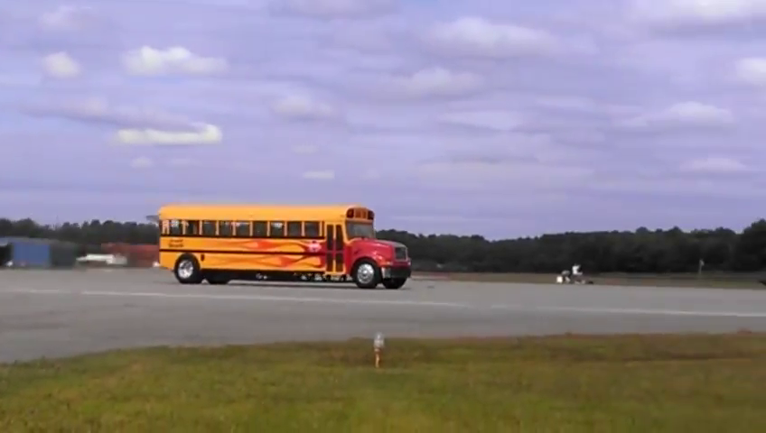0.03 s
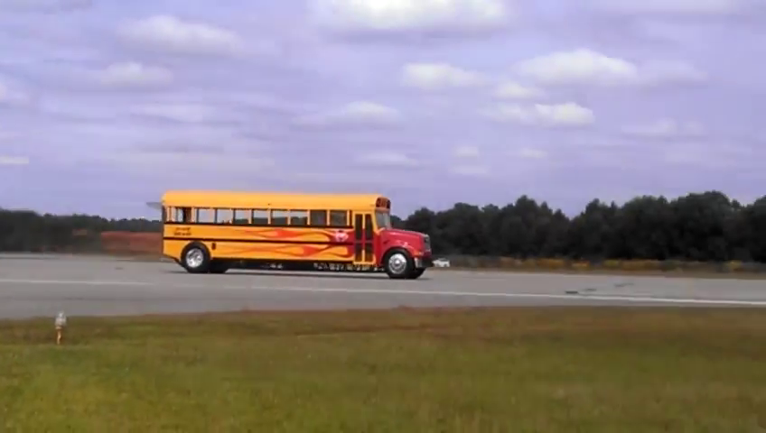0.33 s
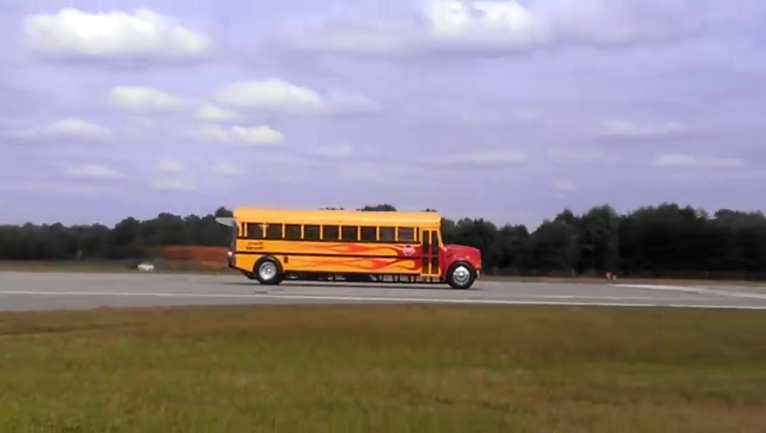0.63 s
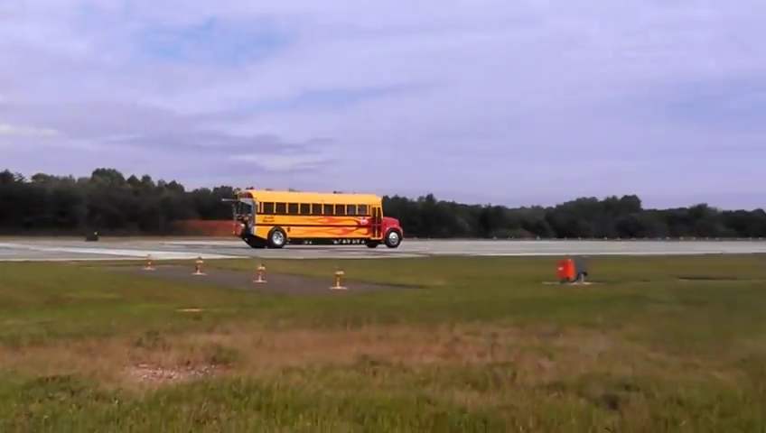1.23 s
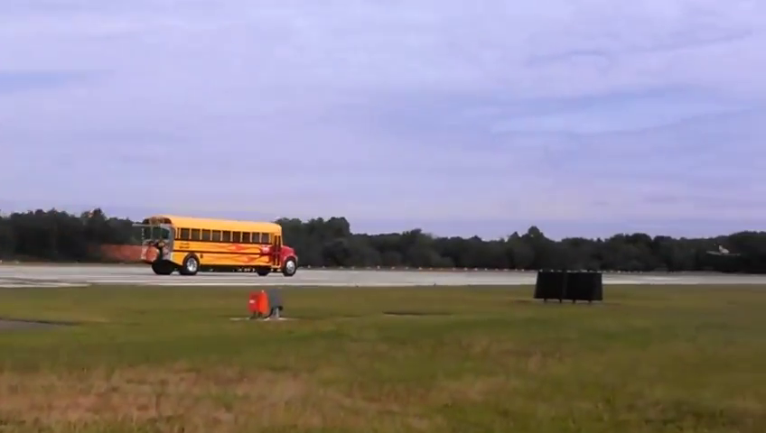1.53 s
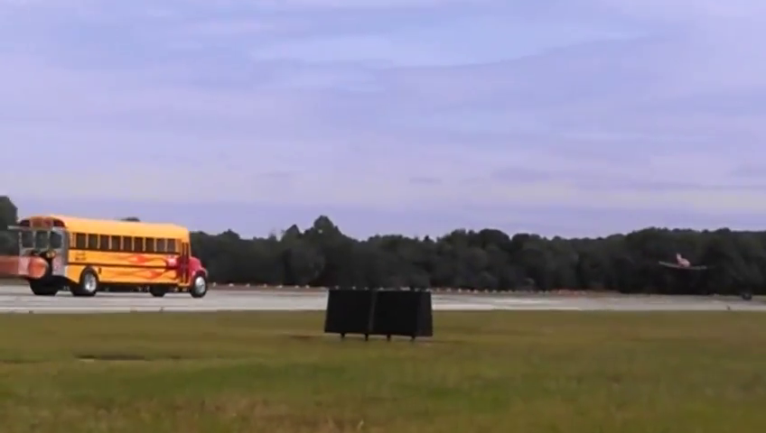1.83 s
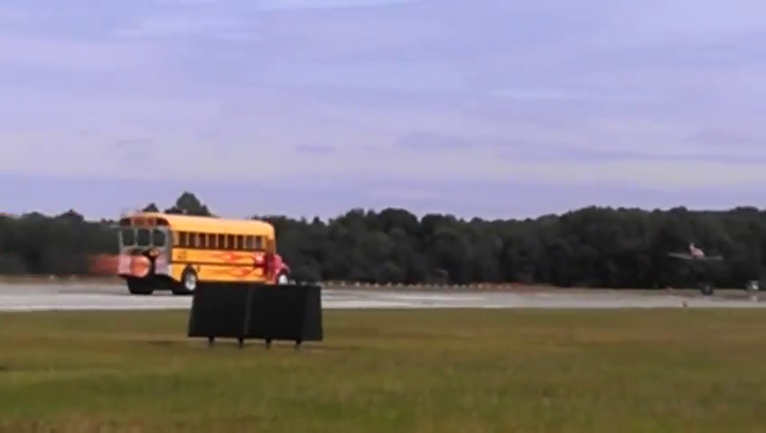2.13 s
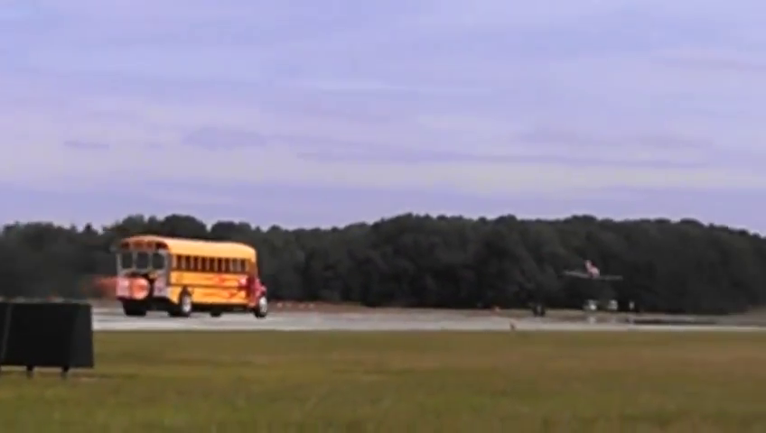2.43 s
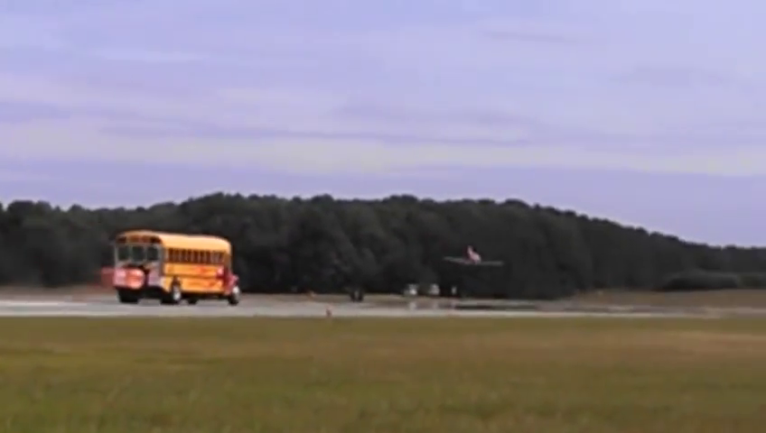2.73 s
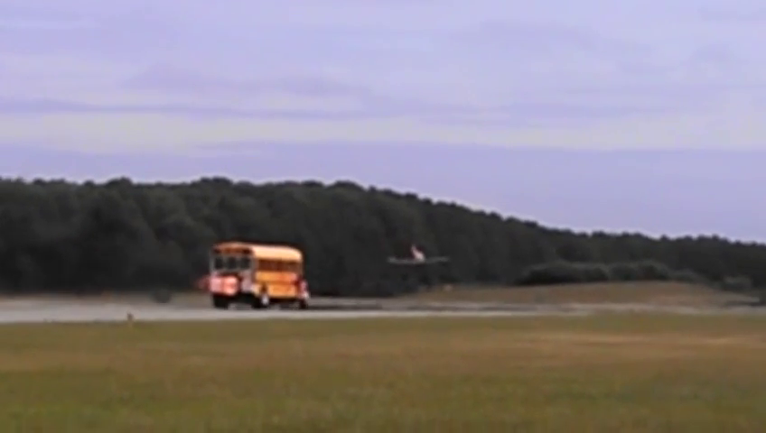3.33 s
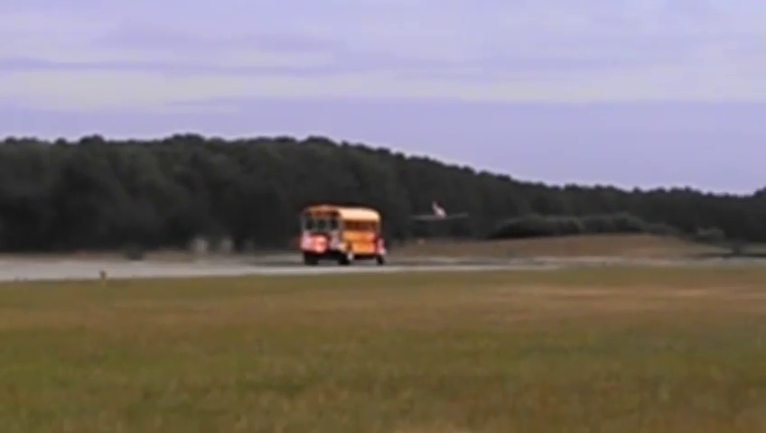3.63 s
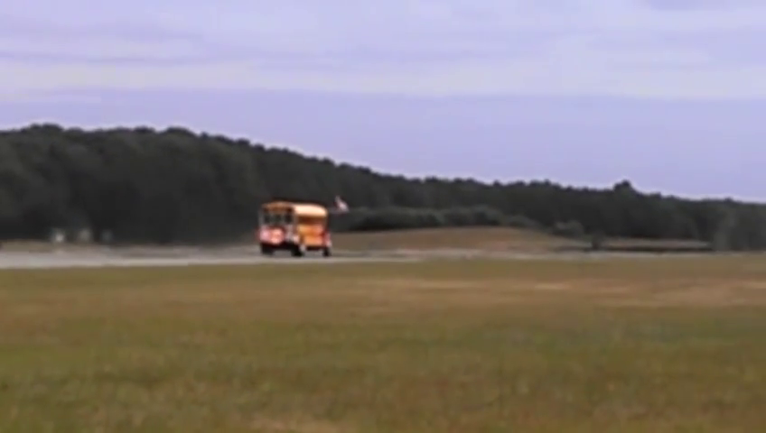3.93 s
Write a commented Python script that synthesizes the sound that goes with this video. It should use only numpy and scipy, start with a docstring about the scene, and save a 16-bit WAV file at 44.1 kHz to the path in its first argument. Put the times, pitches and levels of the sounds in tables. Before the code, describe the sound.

A jet-powered bus speeds past on an open airfield, its hissing whine dropping into a hollow howl and a tearing blast. Wind buffets the overloaded microphone, which rasps and crackles, and a deep roar with dull pops moves away.

```python
"""Jet bus flyby on an airfield

A jet-powered bus speeds past and runs away down the runway. On approach it whines and hisses, combed
by the ground; abeam it howls and blasts, and wind buffets the microphone; behind it a deep roar is
left, with small shock fronts and dull pops. The overloaded microphone rasps and crackles, and a fast
limiter holds the level down."""
import sys
import numpy as np
from scipy import signal
from scipy.fft import rfft, irfft
from scipy.io import wavfile
from scipy.ndimage import uniform_filter1d, minimum_filter1d, map_coordinates

SR = 44100
rng = np.random.default_rng(int(sys.argv[2]) if len(sys.argv) > 2 else 0)


def wav_record(signal):
    """Record a signal, one row per channel, as 16-bit PCM in the file named by sys.argv[1]."""
    frames = np.transpose(np.atleast_2d(signal))
    bounded = np.clip(frames, -1, 1)
    # unit amplitude maps onto the largest positive 16-bit level
    quanta = np.round(bounded * 32767).astype(np.int16)
    wavfile.write(sys.argv[1], SR, quanta)


N = 176400

# Thin hiss of the receding jet: time_s, level_db
FAR_HISS_FADER = [(0, -70), (2.0, -31), (2.5, -29.5), (2.75, -38), (2.95, -61), (3.22, -63.5), (3.3, -50),
                  (3.65, -48.5), (3.75, -50), (3.86, -49), (3.93, -44.5), (4, -35)]
# Its tone: freq_hz, gain_db
FAR_HISS_EQ = [(300, -20.5), (700, -5), (1050, 9.5), (1400, -3.5), (2200, 0.5), (3200, 1.5), (3750, -13.5),
               (4400, -37), (9000, -57.5)]

# Wind on the microphone: time_s, level_db, centre_hz
WIND_TRACK = [(0, -56, 799), (1.0, -20, 948), (1.5, -22.5, 1001), (1.68, -12.5, 858), (1.82, -6, 684.8),
              (1.86, -16.5, 561.3), (2.1, -32, 559.6), (2.5, -49, 559.7), (3, -67.5, 560)]
# Its tone when centred on WIND_HZ: freq_hz, gain_db
WIND_EQ = [(25, -17.5), (55, -4.5), (120, 3.5), (350, -0.5), (520, -2.5), (750, 0.5), (1300, -6),
           (2500, -22.5), (6000, -48.5)]

# Rasp of the overloaded microphone: time_s, level_db, left_minus_right_db
RASP_TRACK = [(0, -52, 17), (.7, -26, 41), (1.2, -16, 0), (1.8, -25, -8), (1.865, -19, 18), (1.92, -13, 8),
              (2.055, -16.5, 15), (2.075, -31, 18), (2.12, -25, 20), (2.18, -22.5, 11), (2.28, -23.5, 13),
              (2.34, -28, 10), (2.37, -32, 19), (2.41, -24, 12), (2.5, -30, 9), (2.6, -49, 10),
              (2.72, -38, 27), (2.8, -88, -2)]
# Its tone: freq_hz, gain_db
RASP_EQ = [(300, -11), (900, -6), (1600, -0.5), (2600, 2.5), (3700, 0.5), (5000, -1), (8000, -10.5),
           (14000, -16.5)]

# Single snaps of overload: start_s, level_db, left_minus_right_db
CRACKLE_CUES = [(2.072, -12, 20), (2.080, -19, 19), (2.086, -9, 24), (2.0915, -7, 25), (2.098, -10, 25),
                (2.129, -17.5, 20), (2.1363, -17.5, 19), (2.151, -10, 23), (2.166, -9.5, 24),
                (2.17, -14, 19), (2.1784, -15.5, 22), (2.188, -8.5, 29), (2.194, -11, 24),
                (2.2196, -13, 21), (2.2275, -22, 16), (2.2383, -6, 19), (2.2538, -3, 26),
                (2.283, -14.5, 21), (2.2973, -6.5, 26), (2.3521, -12, 18), (2.3538, -10.5, 21),
                (2.3888, -11, 24), (2.3948, -16.5, 22), (2.4123, -15.5, 22), (2.4212, -12.5, 18),
                (2.4342, -6.5, 23), (2.456, -25.5, 18), (2.494, -7.5, 29), (2.565, -13, 24),
                (2.5699, -9.5, 24), (2.6253, -5, 39), (2.634, -13.5, 30), (2.675, -18, 28),
                (2.6913, -17, 22), (2.6937, -12.5, 24), (2.7061, -12, 37), (2.891, -15, 37)]
# Their tone: freq_hz, gain_db
CRACKLE_EQ = [(400, -18), (1200, 10.5), (2500, 10.5), (4200, 3), (6500, 2), (10000, -1), (14000, -1.5)]

# Small shock fronts thrown back by the plume: time_s, level_db
SHOCK_FADER = [(0, -58), (1.6, -15), (1.9, -18), (2.29, -16), (2.34, -25), (2.39, -20), (2.5, -24),
               (2.72, -22.5), (2.92, -28.5), (2.98, -39.5), (3.04, -32.5), (3.1, -37), (3.23, -39.5),
               (3.29, -31.5), (3.34, -37), (3.65, -40), (3.75, -40.5), (3.97, -36.5)]
# Their tone: freq_hz, gain_db
SHOCK_EQ = [(100, -16.5), (250, 1.5), (480, 2.5), (780, -2), (1050, -6.5), (1350, -10.5), (2100, -19),
            (3200, -27), (3900, -43.5), (5000, -56.5), (12000, -76)]

# Strong fronts that stand out as dull pops: start_s, relative_level_db
POP_CUES = [(2.351, -8), (2.625, -13), (2.693, -8.5), (2.706, -6), (2.726, -14), (2.747, -11), (2.764, -27),
            (2.802, -11), (2.886, -11), (2.892, -18), (2.908, -14), (2.936, -11), (3.015, -15.5),
            (3.061, -12), (3.141, -17), (3.177, -25.5), (3.268, -15), (3.303, -16), (3.689, -20),
            (3.906, -12.5)]
# Their tone: freq_hz, gain_db
POP_EQ = [(120, -5.5), (450, 6), (1000, 17.5), (1500, 3.5), (2200, -13.5), (3200, -11), (4200, -35),
          (6000, -52), (12000, -65)]

# Turbine whine on approach: time_s, pitch_hz, level_db, left_minus_right_db
WHINE_TRACK = [(0, 2976, -32.5, 11), (.55, 3005, -23, 10), (.85, 2914, -19, 7), (1.0, 2870, -27, 1),
               (1.25, 2826, -25, -9), (1.5, 2650, -35, 3), (2.2, 2381, -100, -0.5)]
# Its tone when pitched at WHINE_HZ: freq_hz, gain_db
WHINE_EQ = [(1500, -59), (2700, -24), (2900, -3), (3000, 0), (3090, -5), (3300, -23), (6000, -59.5)]

# Hollow howl abeam: time_s, top_band_hz, level_db, left_minus_right_db
HOWL_TRACK = [(0, 2517, -44, 9), (.85, 2490, -35.5, 6), (1.0, 2450, -16, -1.5), (1.12, 2407, -18.5, -5),
              (1.25, 2346, -19.5, -6), (1.47, 2226, -19.5, -4), (1.65, 1987, -29, 0), (1.9, 1717, -42, 2),
              (2.3, 1709, -94, 13.5)]
# Its tone with the top band at HOWL_HZ: freq_hz, gain_db
HOWL_EQ = [(600, -51.5), (950, -14.5), (1110, 5), (1290, -16.5), (1520, -2.5), (1710, 3.5), (1980, -12),
           (2220, -7.5), (2400, 4), (2620, -24.5), (5000, -56.5)]

# Delay of the bounce off the ground: time_s, delay_ms
GROUND_DELAY = [(0, 1.96), (.5, 2.06), (.85, 2.12), (1.0, 1.88), (1.2, 1.76), (1.6, 1.64)]
# Hiss ahead of the jet: time_s, level_db, left_minus_right_db
HISS_TRACK = [(0, -15.5, 8), (.35, -13.5, 8.5), (.7, -14.5, 8), (.9, -14.5, -3.5), (1.1, -16.5, -2),
              (1.35, -26, -3.5), (1.7, -36, -4.5), (2.1, -94, 12)]
# Its tone: freq_hz, gain_db
HISS_EQ = [(100, -19), (300, -4), (640, 5), (840, -6.5), (1110, 4), (1330, -9), (1520, 1), (1750, -3),
           (2400, -2), (3400, -2.5), (4000, -8.5), (5500, -19.5), (8000, -28), (14000, -54)]

# Blast as the nozzle passes: time_s, level_db
BLAST_FADER = [(0, -71), (.6, -37), (.8, -20), (1.0, -15.5), (1.2, -11), (1.5, -10), (1.7, -12.5),
               (1.82, -8.5), (1.86, -22), (2.05, -20.5), (2.35, -56.5), (2.8, -92)]
# Its tone: freq_hz, gain_db
BLAST_EQ = [(30, -23), (70, -1), (300, 9), (700, -1), (1300, 3.5), (2500, 4.5), (4000, 0), (7000, -2.5),
            (10000, -6), (14000, -10.5)]

# Deep roar of the plume: time_s, level_db, centre_hz, left_minus_right_db
ROAR_TRACK = [(0, -15, 220.3, 5), (.55, -14.5, 212.7, 8), (.68, -16.5, 195.7, 5.5),
              (.755, -15.5, 177.1, -4), (.795, -2, 185, -10), (.83, -19.5, 196.7, -1),
              (.87, -9.5, 225.9, -5), (1.05, -14, 214.1, -2.5), (1.3, -17.5, 220.3, 1.5),
              (1.6, -16, 214.8, 1), (1.8, -5, 205.6, -0.5), (1.89, -8.5, 206, 4), (2.3, -7, 216.8, 11),
              (2.8, -8.5, 204.6, 7.5), (3.3, -10, 192.3, 7.5), (3.7, -11, 180.3, 7), (4.0, -10, 169.7, 5.5)]
# Its tone when centred on ROAR_HZ: freq_hz, gain_db
ROAR_EQ = [(25, -46.5), (60, -28), (100, -18.5), (135, -4.5), (175, -1), (225, -1), (290, -7), (380, -18.5),
           (520, -30), (800, -48.5), (1600, -100)]
# Its stereo width: time_s, side_to_mid_ratio
ROAR_WIDTH = [(0, 0.19), (.8, 0.18), (1.3, 0.14), (1.8, 0.056), (1.95, 0.39), (2.15, 0.46), (2.4, .13),
              (4, 0.087)]

WIND_HZ, WHINE_HZ, HOWL_HZ, ROAR_HZ = 750, 3000, 2400, 200
APPROACH_WIDTH, RECEDING_WIDTH, RECEDING_PAN_DB = 0.1, 0.35, 8


def undb(db):
    """Decibels to linear gain."""
    return 10 ** (np.asarray(db) / 20)


def unit(x):
    """Normalise to an RMS of 1."""
    return x / np.sqrt(np.mean(x ** 2))


def curve(table, column=1):
    """Automation lane: one column of a table, joined by straight lines in time."""
    rows = np.array(table, float)
    return np.interp(np.arange(N) / SR, rows[:, 0], rows[:, column])


def wobble(rate_hz):
    """Random modulation that glides to a new value rate_hz times a second; RMS 1."""
    hold = max(int(SR / rate_hz), 1)
    steps = np.repeat(rng.standard_normal(N // hold + 1), hold)
    return unit(uniform_filter1d(steps, hold)[:N])


def eq(x, points):
    """Minimum-phase EQ through (freq_hz, gain_db) points; white noise keeps its power."""
    rows = np.array(points, float)
    hz = np.maximum(np.arange(N // 2 + 1) * SR / N, 1)
    gain = unit(undb(np.interp(np.log(hz), np.log(rows[:, 0]), rows[:, 1])))
    cepstrum = irfft(np.log(gain), N)
    cepstrum[1:N // 2] *= 2  # folded forward, so nothing rings ahead of a hit
    cepstrum[N // 2 + 1:] = 0
    return irfft(rfft(x) * np.exp(rfft(cepstrum)), N)


def mid_side(mid, side, width):
    """Left and right from a shared and an opposed part."""
    return mid + width * side * np.array([[1], [-1]])


def noise(width):
    """Stereo white noise; width 0 is mono."""
    return mid_side(rng.standard_normal(N), rng.standard_normal(N), width)


def pan(left_minus_right_db):
    """Left and right gains whose mean is 1."""
    right = 2 / (1 + undb(np.atleast_1d(left_minus_right_db)))
    return np.array([2 - right, right])


def varispeed(x, positions):
    """Play both channels, looped, at moving sample positions."""
    return np.array([map_coordinates(side, [positions], order=3, mode="grid-wrap") for side in x])


def ground_bounce(direct, share):
    """Comb a sound with its slightly later reflection off the ground."""
    delay_samples = curve(GROUND_DELAY) / 1000 * SR
    return direct + share * varispeed(direct, np.arange(N) - delay_samples)


def gliding_bands(track, tone, rest_hz):
    """Narrow bands of noise that follow a track of pitch, level and pan."""
    bands = eq(noise(APPROACH_WIDTH), tone)
    glide = varispeed(bands, np.cumsum(curve(track)) / rest_hz)
    return glide * undb(curve(track, column=2)) * pan(curve(track, column=3))


def far_hiss():
    """Thin hiss of the receding jet, fading in and out on its way across the field."""
    air = eq(noise(RECEDING_WIDTH), FAR_HISS_EQ)
    return air * undb(curve(FAR_HISS_FADER) + 1.7 * wobble(20)) * pan(RECEDING_PAN_DB)


def wind():
    """A fluttering gust on the microphone, peaking just after the pass; its whoosh drops and dies."""
    gust = eq(noise(width=0.8) * unit(undb(0.91 * wobble(70))), WIND_EQ)
    whoosh = varispeed(gust, np.cumsum(curve(WIND_TRACK, column=2)) / WIND_HZ)
    return whoosh * undb(curve(WIND_TRACK))


def mic_rasp(swing, threshold=0.55, bed=0.2, flicker_db=2.5):
    """Over a bed of fizz, the microphone spits each time the roar swings it far to one side."""
    overload = np.clip(-swing - threshold, 0, 0.54)
    gate = unit((bed + overload) * undb(flicker_db * wobble(180)))
    spit = eq(noise(width=0.96) * gate, RASP_EQ)
    return spit * undb(curve(RASP_TRACK)) * pan(curve(RASP_TRACK, column=2))


def mic_crackles(rise_s=0.0007, decay_s=0.0009, ring_hz=4200, ring_s=0.0025):
    """Lone snaps of overload, mostly on the left: a spike in a tiny spit of noise, then a brief ring."""
    snaps, rings = np.zeros((2, N)), np.zeros((2, N))
    age = np.arange(-SR // 100, SR // 50) / SR
    spit_envelope = np.exp(-np.abs(age) / np.where(age < 0, rise_s, decay_s))
    ring_envelope = (age > 0) * undb(-15) * np.exp(-np.abs(age) / ring_s)
    ring = ring_envelope * np.sin(2 * np.pi * ring_hz * age)
    for start_s, level_db, pan_db in CRACKLE_CUES:
        gains = undb(level_db) * pan(pan_db)
        spike = (age == 0) * undb(12) * rng.choice([-1, 1])
        spit = spit_envelope * rng.standard_normal(len(age))
        i = int((start_s + age[0]) * SR)
        snaps[:, i:i + len(age)] += gains * (spike + spit)
        rings[:, i:i + len(age)] += gains * ring
    return eq(snaps, CRACKLE_EQ) + rings


def shocks(fronts_per_s=650, scatter_db=2.9, surge_db=1.8, rush=0.5):
    """Steep fronts at random moments, mostly small, over a smooth rush; all dulled by distance."""
    hits = rng.random(N) < fronts_per_s / SR
    sizes = undb(scatter_db * np.minimum(rng.exponential(size=N), 3.5))
    fronts = unit(hits * sizes * undb(surge_db * wobble(21.95)))
    sputter = unit(fronts - fronts.mean() + rush * rng.standard_normal(N))
    stereo = mid_side(sputter, sputter * rng.standard_normal(N), RECEDING_WIDTH)
    return eq(stereo, SHOCK_EQ) * undb(curve(SHOCK_FADER)) * pan(RECEDING_PAN_DB)


def pops(boost_db=7, tail_s=0.0025, tail_db=-22):
    """Single strong shock fronts from the receding plume, each with a short scattered tail."""
    fronts = np.zeros(N)
    age = np.arange(SR // 50) / SR
    spike = age == 0
    for start_s, level_db in POP_CUES:
        tail = undb(tail_db) * np.exp(-age / tail_s) * rng.standard_normal(len(age))
        i = int(start_s * SR)
        fronts[i:i + len(age)] += undb(level_db + boost_db) * (spike + tail)
    return eq(fronts, POP_EQ) * pan(RECEDING_PAN_DB)


def whine():
    """The turbine's whine on approach: one tight band that slides down during the pass."""
    return gliding_bands(WHINE_TRACK, WHINE_EQ, WHINE_HZ)


def howl():
    """The lower, hollow howl abeam: several bands falling together as the jet goes by."""
    return gliding_bands(HOWL_TRACK, HOWL_EQ, HOWL_HZ)


def hiss():
    """Fine turbulence heard from ahead, made hollow by the ground reflection."""
    direct = eq(noise(APPROACH_WIDTH), HISS_EQ) * undb(0.85 * wobble(25))
    hollow = ground_bounce(direct, share=0.32)
    return hollow * undb(curve(HISS_TRACK)) * pan(curve(HISS_TRACK, column=2))


def blast():
    """Broad, tearing noise while the nozzle is abeam, lightly combed by the ground."""
    tearing = unit(undb(1.1 * wobble(400) + 0.5 * wobble(30)))
    direct = eq(noise(width=0.7) * tearing, BLAST_EQ)
    return ground_bounce(direct, share=0.16) * undb(curve(BLAST_FADER)) * pan(0.5)


def plume_eddies(waver=0.025, swell_db=0.8):
    """Pressure swing of the plume's large eddies: a low band that wavers and sinks as the jet leaves."""
    eddies = eq(noise(curve(ROAR_WIDTH)), ROAR_EQ)
    power = uniform_filter1d(np.mean(eddies ** 2, axis=0), size=1400, mode="wrap")
    levelled = eddies / np.sqrt(power)
    centre_hz = curve(ROAR_TRACK, column=2) * (1 + waver * wobble(9))
    return varispeed(levelled, np.cumsum(centre_hz) / ROAR_HZ) * undb(swell_db * wobble(14))


def roar(swing):
    """The plume's deep roar: the swing of its eddies, ridden in level and pan through the pass."""
    return swing * undb(curve(ROAR_TRACK)) * pan(curve(ROAR_TRACK, column=3))


def scene():
    """Mix the pass, its wake and the microphone overload; the same eddies drive roar and rasp."""
    swing = plume_eddies()
    flyby = roar(swing) + hiss() + whine() + howl() + blast() + wind()
    wake = shocks() + far_hiss() + pops()
    return flyby + wake + mic_rasp(swing) + mic_crackles()


def record(dry):
    """A fast limiter on each channel that misses the sharpest peaks, a clip on those, a steep top cut."""
    ceiling, clip_level, window_s, top_hz = 0.8, 0.81, 0.0035, 14000
    window = int(window_s * SR)
    detector = np.abs(uniform_filter1d(dry, size=14))  # smoothed, so spikes slip through
    gain = minimum_filter1d(ceiling / np.maximum(detector, ceiling), window)
    smooth_gain = uniform_filter1d(uniform_filter1d(gain, window // 2), window // 2)
    clipped = np.clip(dry * smooth_gain, -clip_level, clip_level)
    top_cut = signal.ellip(10, 0.1, 70, top_hz, fs=SR, output="sos")
    return signal.sosfilt(top_cut, clipped)


dry = scene()
out = record(dry)
wav_record(out)
```